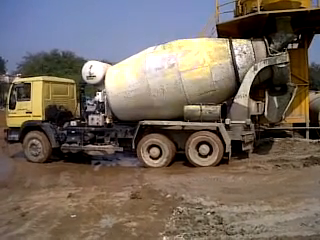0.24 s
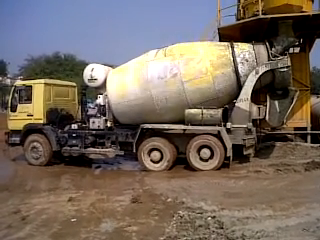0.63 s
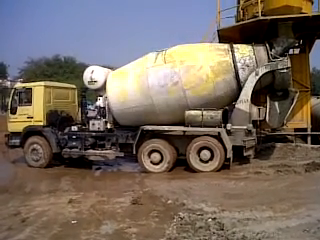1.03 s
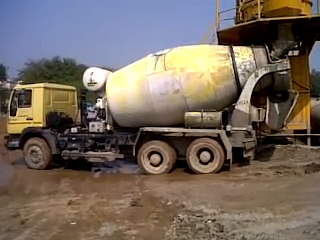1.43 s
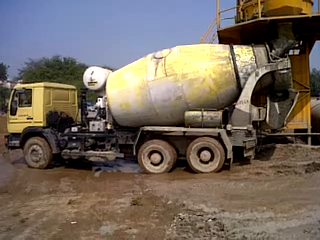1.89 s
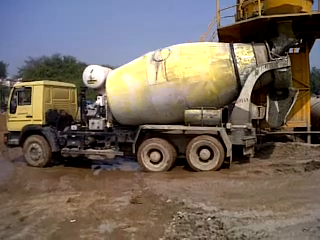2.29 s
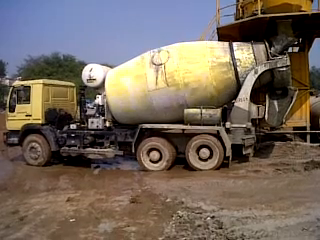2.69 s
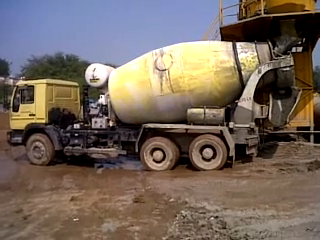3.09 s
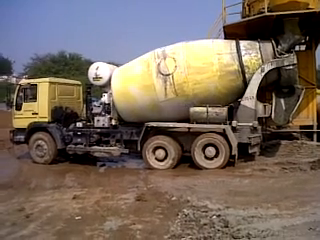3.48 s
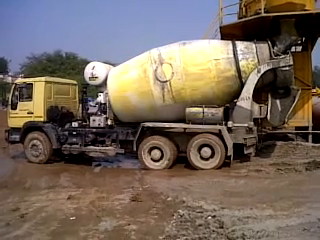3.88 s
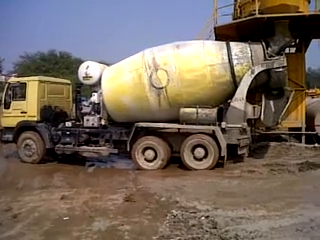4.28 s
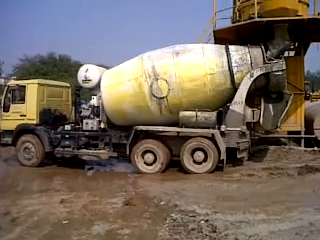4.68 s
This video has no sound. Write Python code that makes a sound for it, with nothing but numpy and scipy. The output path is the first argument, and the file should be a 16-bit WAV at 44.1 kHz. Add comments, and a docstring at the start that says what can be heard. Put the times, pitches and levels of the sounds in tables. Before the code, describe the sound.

Steady grainy roar of gravel loading into a turning mixer drum, over engine rumble and whine, with sharp ticks and two bursts of hollow clunks.

```python
"""Across a yard, a mixer truck takes its load under a batching plant, heard through one small microphone.
From the start a diesel idles (sines at its firing orders), a gear drive hums with a once-a-turn throb, a pump whines
and gravel rushes down a chute (coloured, grainy noise) while stones tick on steel (short rings and noise sprays).
A little after one second a cluster of lumps knocks the hollow drum (decaying shell modes). Past two seconds the
engine picks up in two steps; a second cluster of knocks follows, then scattered ones, over the running gravel."""
import sys
import numpy as np
from scipy import signal
from scipy.fft import rfft, irfft, next_fast_len
from scipy.io import wavfile
from scipy.ndimage import uniform_filter1d, map_coordinates

SR = 44100
rng = np.random.default_rng(int(sys.argv[2]) if len(sys.argv) > 2 else 0)


def ratio(d):
    """dB to gain"""
    e = np.asarray(d, float) / 20
    return 10 ** e


def pcm_store(signal):
    """Save signal as 16-bit PCM."""
    levels = np.round(np.clip(np.atleast_2d(signal), -1, 1) * 32767)
    wavfile.write(sys.argv[1], SR, levels.astype(np.int16).T)


N = 217677  # samples

# Machine hums: pitch_hz
HUM_PITCHES = [30.1, 102.3, 174.3, 221, 252.2, 694, 803.9, 1108]
# The same hums: base level_db (rms), drift_db_per_s
HUM_LEVELS = [(-62.5, 1), (-55, 0.2), (-48.5, -0.5), (-57.5, 1.5), (-43.5, -2.66), (-47.5, -0.2),
              (-52.5, 0.5), (-50.5, -0.8)]
# Pump slowing and speeding under its load: start_s, pitch_hz, level_db (rms)
PUMP_COURSE = [(0, 441, -41), (.5, 441, -40.5), (.6, 441.5, -47), (.75, 442, -39.5), (1.2, 442, -44.5),
               (1.4, 438.5, -43.5), (2, 440, -39), (2.2, 447, -46.5), (2.45, 443, -43.5),
               (2.73, 435, -51.5), (3, 441, -40.5), (3.5, 445, -47), (3.8, 440, -42.5), (4.1, 435, -42.5),
               (4.3, 437, -41), (4.67, 445, -46.5), (4.94, 446, -47.5)]
SHAFT_HZ = 15.98
# Gear drive of 18 teeth, the mesh and its neighbours from the eccentric shaft: multiple of the shaft rate
GEAR_ORDERS = [13, 15, 17, 18, 19, 20, 33, 34, 35, 36, 37, 39]
# The same gear tones: base level_db (rms)
GEAR_LEVELS = [-56, -51, -62, -41, -67, -51, -53, -58.5, -55.5, -42.5, -49.5, -60.5]
# Engine: start_s, firing_hz, exhaust level_db, bark_db (per order, pivoting on the second)
ENGINE_COURSE = [(0, 43.3, -1, -3.5), (1.0, 43.2, -5, 2.5), (1.95, 43.4, -3, .1), (2.16, 50.5, 6, -1.5),
                 (2.27, 46, -5, -2), (2.4, 49.9, 1, -2), (2.7, 51.1, 3.5, 2.2), (3.25, 51.06, 3.5, -5),
                 (3.42, 50.7, -11, -12), (3.6, 50.83, 1.3, -2), (3.9, 50.94, -0.5, 6),
                 (4.4, 51.77, 0.5, 2.5), (4.75, 52.5, 3, 1.5), (4.94, 48.96, 5, 2)]
# Exhaust orders 1 to 4 of the firing rate: base level_db (rms)
EXHAUST_LEVELS = [-51.5, -47, -50, -60.5]
# Exhaust pipe response: frequency_hz, gain_db
PIPE_RESPONSE = [(42, 2), (52, -0.5), (86, 0), (102, -0.5), (130, 1), (154, 0), (210, -1)]

# Moving load: start_s, drum tumble level_db (rms), chute flow level_db (rms)
FLOW_COURSE = [(0, -31.5, -42.5), (0.5, -33.5, -44.5), (1.15, -31.5, -43.5), (1.35, -32, -45.5),
               (2.1, -33.5, -44), (2.55, -31.5, -42.5), (2.8, -32, -45), (3.32, -34, -45),
               (3.68, -33, -43.5), (4.03, -34, -44), (4.2, -31.5, -42), (4.6, -32.5, -44.5),
               (4.93, -33.5, -44.5)]
# Colour of the charge tumbling in the drum: frequency_hz, relative gain_db
RUMBLE_COLOUR = [(12, -39.5), (21, -28), (35, -16), (81, -6.5), (140, -6.5), (194, -4.5), (283, -2.5),
                 (392, -6), (434, -6.5), (490, -3), (530, -4.5), (575, 0), (640, -2), (739, -7),
                 (1110, -7.5), (1260, -13), (1490, -14.5), (1990, -29.5), (2100, -27.5), (2730, -63.5),
                 (4620, -120)]
# Colour of the gravel in the chute: frequency_hz, relative gain_db
RUSH_COLOUR = [(1000, -11.5), (1700, 0), (2000, -5.5), (2180, 0.5), (2450, 2), (3360, 0), (3900, -3.5),
               (4700, -18.5), (6110, -40), (10300, -120)]
# Colour of the sand hiss: frequency_hz, relative gain_db
HISS_COLOUR = [(2650, -30.5), (4500, 4.5), (4690, -18), (5040, 0.5), (6270, 6), (7000, -5.5), (9100, -59),
               (15400, -120)]
SAND_DB, SAND_GROWS = -63, 2  # hiss at mean flow (dB rms); its dB per dB of chute flow

# Stones on steel, placed by time: start_s, nominal peak level_db, pitch_hz
STONE_HITS = [(0.0567, -25.5, 3620), (0.0972, -33.5, 3650), (0.3077, -29, 3800), (0.5267, -30.5, 2320),
              (0.6155, -38, 2650), (0.7167, -25, 3120), (0.7692, -29, 3550), (0.8074, -22.5, 3345),
              (0.8145, -26.5, 3200), (0.9527, -41, 2500), (1.224, -21.5, 3400), (1.3266, -27.5, 2660),
              (1.5322, -28.5, 3480), (1.6073, -27, 3650), (1.6344, -24.5, 3400), (1.735, -31.5, 2960),
              (1.7679, -36, 2540), (1.8251, -29, 3140), (1.9063, -26.5, 2400), (1.939, -24, 2800),
              (1.9924, -20.5, 3540), (2.1086, -31, 2560), (2.1675, -29.5, 3400), (2.143, -43.5, 2840),
              (2.1874, -24.5, 2830), (2.228, -27, 3400), (2.2543, -26, 2890), (2.3351, -36, 2660),
              (2.3588, -24, 3400), (2.579, -30, 3820), (2.603, -22.5, 3350), (2.8185, -30.5, 3440),
              (2.8772, -25, 3500), (2.9716, -27.5, 3482), (3.0045, -28, 3140), (3.024, -25.5, 2430),
              (3.0634, -26, 2480), (3.2793, -25, 3070), (3.3034, -29, 2400), (3.4037, -31, 3010),
              (3.4237, -28, 3470), (3.5239, -29.5, 2700), (3.6026, -26, 3400), (3.6614, -26, 2460),
              (3.703, -22.5, 3650), (3.7212, -20.5, 3370), (3.7242, -20, 3500), (3.7662, -23, 3290),
              (4.1083, -36, 2670), (4.1425, -27.5, 3420), (4.3211, -40, 2480), (4.357, -41, 3700),
              (4.4952, -30.5, 3354), (4.5753, -34, 3138), (4.6324, -28.5, 2973), (4.6815, -28, 3230),
              (4.788, -25, 2857)]
# More stones at random times, mostly quieter: how many, top level (dB), range below it (dB), pitch range (Hz)
PEBBLES, PEBBLE_DB, PEBBLE_SPREAD_DB = 160, -39.5, 6
PEBBLE_LOW_HZ, PEBBLE_HIGH_HZ = 2147, 3400
# Treble gain for a -26 dB stone (dB), its random spread (dB), dB lost per dB of size
TREBLE_DB, TREBLE_SPREAD_DB, BIG_IS_DULL = -14.5, 1, 0.21

# Lumps on the drum: start_s, nominal peak level_db, pitch_hz of the place struck, brightness_db (per octave)
LUMP_HITS = [(.644, -24, 554, 12), (.79, -18, 898, 4), (.82, -21, 990, 1), (.849, -20.5, 910, 16),
             (1.205, -15.5, 736, -14.5), (1.218, -15.5, 558, 15), (1.218, -13, 1035, 3.5),
             (1.224, -20, 1440, 2.5), (1.227, -26, 1700, 9), (1.236, -21.5, 900, -5.5),
             (1.2254, -9, 540, 7), (1.231, -13, 516, 1), (1.24, -17.5, 546, 2), (1.256, -18, 440, 7),
             (1.278, -20, 480, 2.5), (1.248, -18.5, 914, 2.5), (1.264, -12, 333, -9),
             (1.288, -22, 556, 2.5), (1.299, -22, 249, -3.5), (1.597, -9.5, 237, -1),
             (1.85, -27, 540, 22.5), (2.461, -15, 903, 24), (2.655, -14, 607, 2.5), (2.664, -21.5, 610, 2),
             (2.666, -22, 1404, 5), (2.675, -12, 991, 12), (2.6905, -10.5, 510, 0), (2.6905, -16, 996, 1),
             (2.698, -21, 306, 4), (2.702, -14.5, 913, 9), (2.683, -25, 740, 3), (2.704, -27.5, 517, -2),
             (2.72, -20, 587, 2.5), (2.73, -26, 1005, 2), (2.742, -17, 940, 3), (2.755, -20.5, 445, 4),
             (2.778, -16.5, 474, 0), (3.035, -15, 453, 12), (3.161, -23.5, 817, 0), (3.773, -18, 930, 0),
             (4.326, -25.5, 901, 1), (4.409, -35.5, 532, -1), (4.475, -23.5, 1257, -11.5),
             (4.7, -13.5, 230, -4), (4.827, -14.5, 780, -1)]
# Drum shell modes: frequency_hz, relative level_db, t60_s
SHELL_MODES = [(164, -6, 0.092), (298, 3, 0.019), (480, -10.5, 0.033), (540, -2.5, 0.095), (624, 2, 0.12),
               (740, -6.5, 0.11), (903, -7.5, 0.14), (1035, -1.5, 0.12), (1180, -3.5, 0.057),
               (1344, -12, 0.087), (1445, -16, 0.14), (1750, -26, 0.034)]
# Yard echo: frequency_hz, t60_s
YARD_DECAY = [(200, 0.69), (1500, 0.076), (6000, 0.31)]


def unit(x):
    """Bring to rms 1."""
    return x / np.sqrt(np.mean(x ** 2) + 1e-20)


def along(points, hz):
    """(Hz, value) points read on a log frequency axis."""
    f, v = np.transpose(points)
    return np.interp(np.log(hz + 1), np.log(f + 1), v)


def curves(rows):
    """One value per sample for each column after the time."""
    s, *cols = np.transpose(rows)
    return [np.interp(np.arange(N) / SR, s, c) for c in cols]


def wobble(rate):
    """A smooth random curve, rate knots a second (40 at most)."""
    knots = rng.standard_normal(int(N * 40 / SR) + 4)
    return map_coordinates(knots, [np.arange(N) * min(rate, 40) / SR])


def turns(hz):
    """Running phase of a rate curve, in radians."""
    return 2 * np.pi * np.cumsum(hz * np.ones(N)) / SR


def tone(phase, db):
    """A sine of the given rms level."""
    return np.sqrt(2) * ratio(db) * np.cos(phase)


def coloured(x, spectrum):
    """x through a (Hz, dB) spectrum, at rms 1."""
    m = next_fast_len(N + 8192)
    gain = ratio(along(spectrum, np.fft.rfftfreq(m, 1 / SR)))
    return unit(irfft(rfft(x, m) * gain, m)[:N])


def patchy(depth_db):
    """Noise with patches of random gain in time and frequency."""
    z = signal.stft(rng.standard_normal(N + 512), nperseg=512)[2]
    field = uniform_filter1d(rng.standard_normal(z.shape), size=6, axis=0)
    field = uniform_filter1d(field, size=10, axis=1)
    return signal.istft(z * ratio(depth_db * unit(field)), nperseg=512)[1][:N]


def sprinkle(count, spread_db, life_s):
    """A gain that jumps at random instants and dies away: many small impacts, none very large."""
    at, size = rng.random((2, count))
    heights = ratio(-spread_db * np.log(1 - 0.95 * size))
    jolts = np.bincount((at * N).astype(int), heights, N)
    return signal.lfilter([1], [1, -np.exp(-1 / (life_s * SR))], jolts)


def shaft():
    """Angle of the drive shaft, in radians."""
    return turns(SHAFT_HZ) - 4.2


def throttle():
    """Firing rate, exhaust level and bark: the engine idles, then picks up in two steps."""
    return curves(ENGINE_COURSE)


def yard(x):
    """Echoes off plant and ground: a noise tail in which each frequency dies at its own speed."""
    hz, t, z = signal.stft(rng.standard_normal(SR // 2), SR, nperseg=256)
    decay = ratio(-60 * t / along(YARD_DECAY, hz)[:, None])
    tail = signal.istft(z * decay, SR, nperseg=256)[1]
    late = np.pad(x, (500, 0))  # echoes lag by 500 samples
    return signal.fftconvolve(late, tail / np.linalg.norm(tail))[:N]


def gear_drive():
    """Tooth mesh locked to the shaft; its neighbours a shaft rate apart beat into a once-a-turn throb."""
    return sum(tone(order * shaft() + 0.2 * wobble(5), db + 1.1 * wobble(8))
               for order, db in zip(GEAR_ORDERS, GEAR_LEVELS))


def machine_hums():
    """Free-running hums that drift and waver in level; the higher ones stray further in phase."""
    t = np.arange(N) / SR
    return sum(tone(turns(hz) + hz / 400 * wobble(7.5), db + 3 * wobble(2.3) + drift_db * t)
               for hz, (db, drift_db) in zip(HUM_PITCHES, HUM_LEVELS))


def pump():
    """A whine that slows and speeds under its load."""
    hz, db = curves(PUMP_COURSE)
    return tone(turns(hz) + 0.25 * wobble(9.9), db + 1.0 * wobble(12))


def diesel():
    """Low exhaust orders through the pipe response, each a little unsteady."""
    hz, load_db, bark_db = throttle()
    out = np.zeros(N)
    for k, db in enumerate(EXHAUST_LEVELS):
        phase = (k + 1) * (turns(hz) + 0.085 * wobble(13.0))
        pipe_db = along(PIPE_RESPONSE, (k + 1) * hz)
        out += tone(phase, db + load_db + bark_db * (k - 1) + pipe_db + wobble(7.9))
    return out


def load():
    """The charge tumbles in the drum and rushes in the chute; countless small stones make it grainy."""
    rumble_db, rush_db = curves(FLOW_COURSE)
    hiss_db = SAND_DB + SAND_GROWS * (rush_db - rush_db.mean())
    firing = np.cos(turns(throttle()[0]))
    shaking = ratio(0.21 * firing + 0.13 * np.cos(shaft()))  # engine and shaft shake the body
    clatter = ratio(0.24 * firing)  # each firing rattles the steel
    surge = ratio(0.35 * wobble(9) + 0.4 * wobble(25))

    tumble = shaking * (1 + 0.2 * sprinkle(count=250, spread_db=2, life_s=0.012))
    grit = sprinkle(count=2400, spread_db=2, life_s=0.003)
    sand = sprinkle(count=400, spread_db=10.5, life_s=0.0052)

    rumble = coloured(tumble * patchy(depth_db=0.74), RUMBLE_COLOUR)
    rush = coloured((1 + 0.16 * grit) * clatter * surge * patchy(depth_db=1.02), RUSH_COLOUR)
    hiss = coloured((1 + 0.87 * grit + 0.75 * sand) * surge * patchy(depth_db=0.5), HISS_COLOUR)
    return ratio(rumble_db) * rumble + ratio(rush_db) * rush + ratio(hiss_db) * hiss


def stones():
    """Each stone rings briefly at its own pitch, skips once and sheds a spray of chips."""
    out, t = np.zeros(N + SR), np.arange(SR // 10) / SR
    low = signal.butter(3, [2300, 4100], "band", fs=SR, output="sos")
    high = signal.butter(4, [4700, 6700], "band", fs=SR, output="sos")
    when, size, pitch = rng.random((PEBBLES, 3)).T
    pebbles = zip(0.0074 + when * N / SR,
                  PEBBLE_DB - PEBBLE_SPREAD_DB * size,
                  PEBBLE_LOW_HZ + (PEBBLE_HIGH_HZ - PEBBLE_LOW_HZ) * pitch)
    for s, db, hz in [*STONE_HITS, *pebbles]:
        treble_db = TREBLE_DB - BIG_IS_DULL * (db + 26.0) + TREBLE_SPREAD_DB * rng.standard_normal()
        low_noise, high_noise = rng.standard_normal((2, len(t)))
        # time away from the first contact and from the skip
        away = np.abs(t - np.array([[0.002], [0.004 + 0.006 * rng.random()]]))
        contacts = np.array([1, 0.55]) @ ratio(-60 * away / 0.003)
        chips = ratio(-60 * t / 0.15) * (1 - np.exp(-t / 0.0052))
        spray = 0.078 * contacts + 0.27 * chips
        ring = (2.92 * contacts + 0.065 * ratio(-60 * t / 0.067)) * np.cos(2 * np.pi * hz * away[0])
        crack = signal.sosfilt(low, spray * low_noise)
        crack += ratio(treble_db) * signal.sosfilt(high, (spray + 0.74 * contacts) * high_noise)
        hit = signal.sosfilt(low, ring) + 7.04 * crack
        out[round(s * SR) - 80:][:len(t)] += ratio(db - 11.5) * hit  # first contact lands near start_s
    return out[:N]


def lumps():
    """A lump rings the shell modes, weighted by nearness to the struck pitch and by brightness,
    plus a tone at that pitch."""
    out, t = np.zeros(N + SR), np.arange(SR // 4) / SR
    band = signal.butter(2, [350, 1900], "band", fs=SR, output="sos")
    f, level, t60 = np.transpose(SHELL_MODES)[:, :, None]
    for s, db, hz, bright_db in LUMP_HITS:
        luck = rng.standard_normal((2, len(SHELL_MODES), 1))
        octaves = np.log2(f / hz)
        weight_db = level - 3.0 - 6 * np.abs(octaves) + bright_db * octaves + 2 * luck[0]
        modes = np.sin(2 * np.pi * f * (1 + 0.021 * luck[1]) * t)
        shell = (ratio(weight_db - 60 * t / t60) * modes).sum(axis=0)
        local = 2.74 * ratio(-60 * t / 0.053) * np.sin(2 * np.pi * hz * t)
        breaking = 0.9 * ratio(-60 * t / 0.11) + ratio(-60 * t / 0.025)
        crash = breaking * signal.sosfilt(band, rng.standard_normal(len(t)))  # the lump breaks up
        onset = 1 - np.exp(-t * hz / 0.38)  # contact lasts a share of a cycle
        out[round(s * SR):][:len(t)] += ratio(db - 16.5) * (shell + local + crash) * onset
    no_bass = signal.butter(2, 110, "high", fs=SR, output="sos")  # the knocks carry no deep bass
    return signal.sosfilt(no_bass, out[:N])


def scene():
    """All sources on one channel; the blows come with their yard echoes."""
    blows = stones() + lumps()
    machinery = gear_drive() + machine_hums() + pump() + diesel()
    return (machinery + load() + blows + ratio(-7.0) * yard(blows))[None]


def low_pass(x):
    """Removes everything above the highest recorded frequency."""
    return signal.sosfilt(signal.butter(12, 7840, fs=SR, output="sos"), x)


def record(dry):
    """A small microphone whose response falls away steeply above 7 kHz."""
    top = signal.butter(20, 7000, fs=SR, output="sos")
    mix = signal.sosfilt(top, dry)
    return low_pass(mix)


dry = scene()
out = record(dry)
pcm_store(out)
```